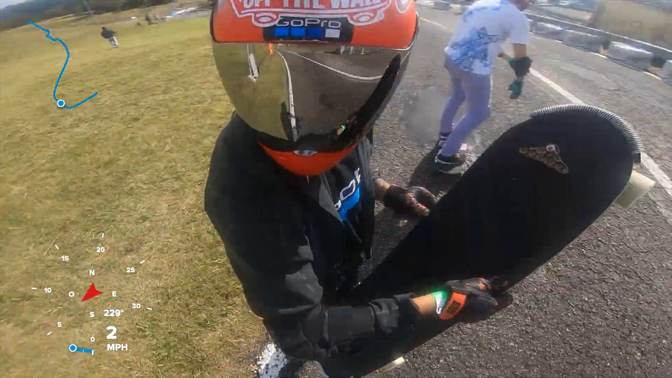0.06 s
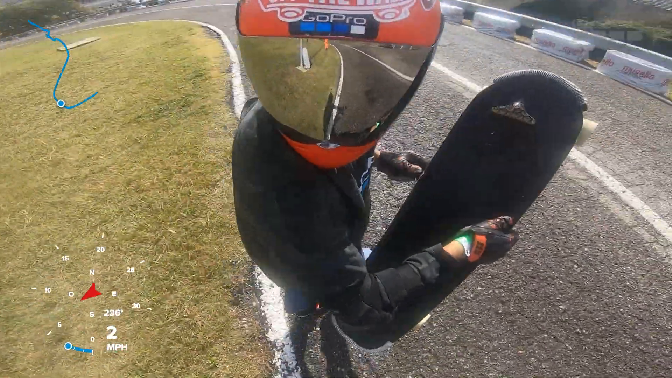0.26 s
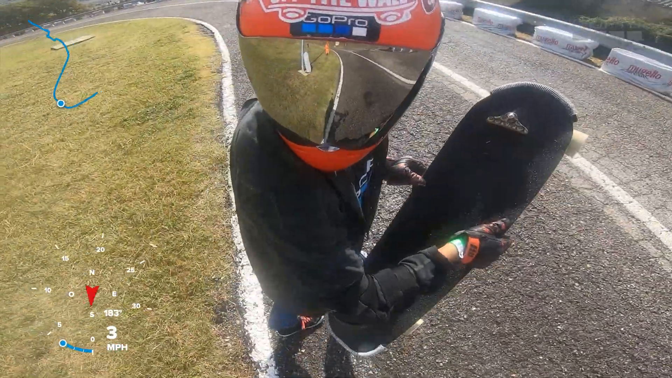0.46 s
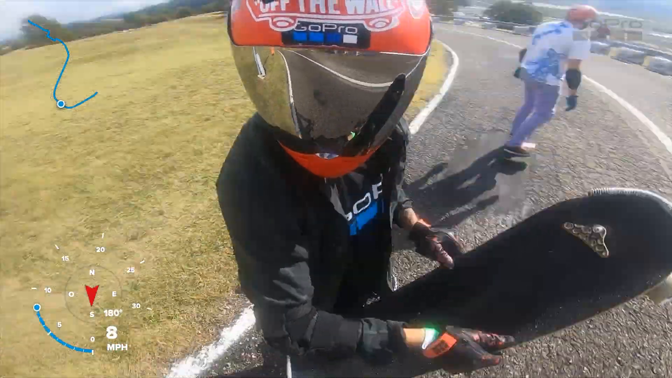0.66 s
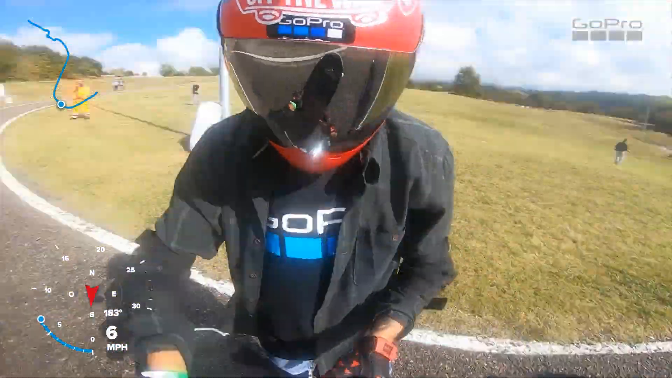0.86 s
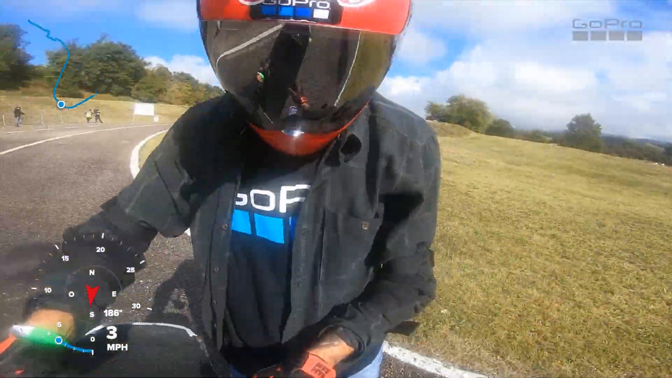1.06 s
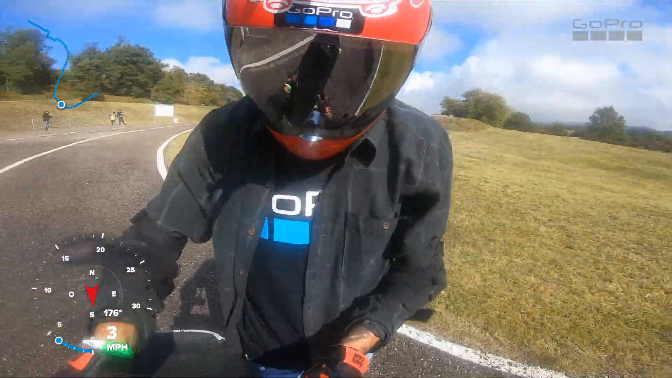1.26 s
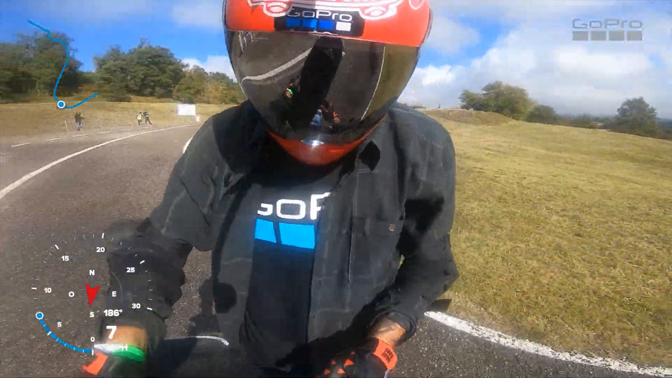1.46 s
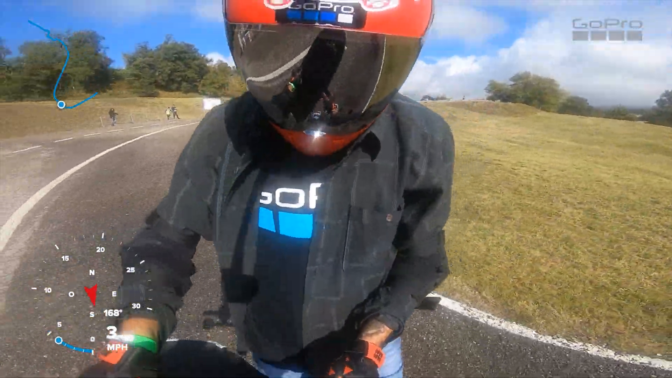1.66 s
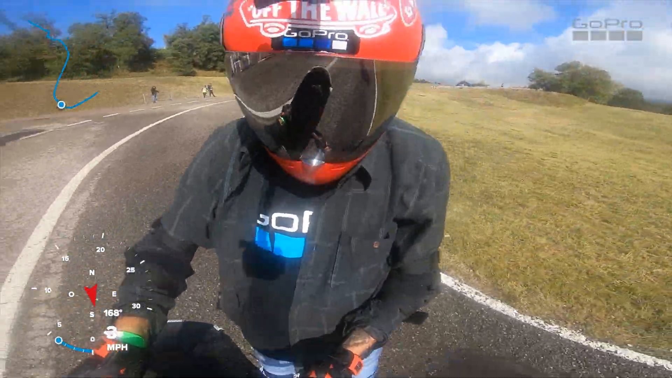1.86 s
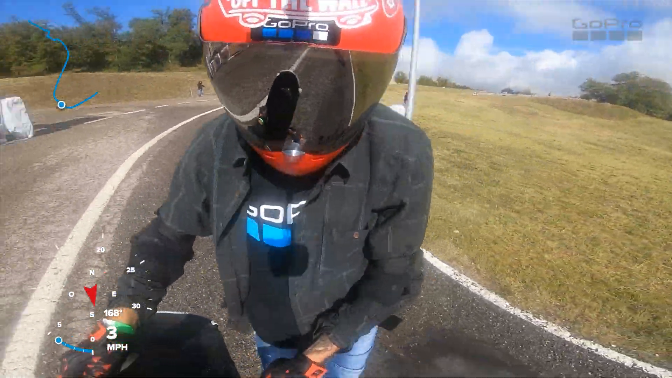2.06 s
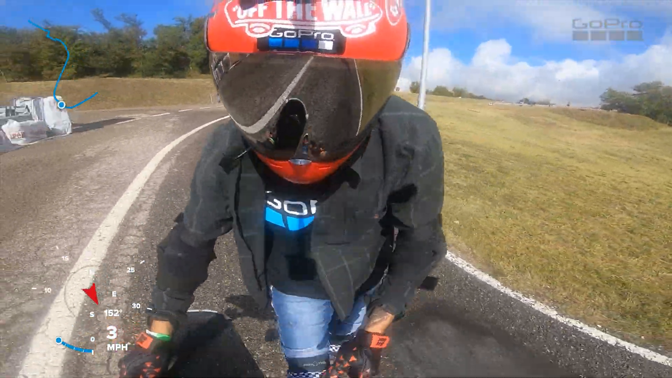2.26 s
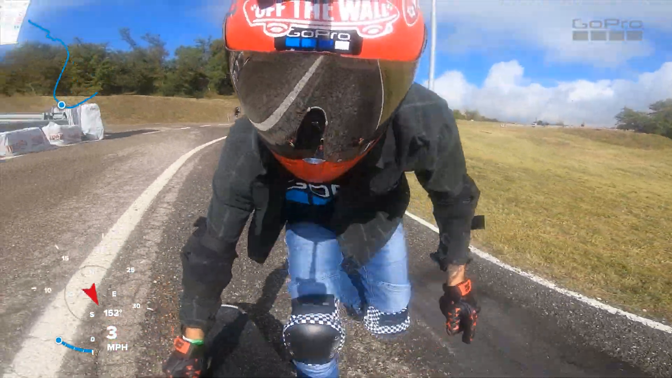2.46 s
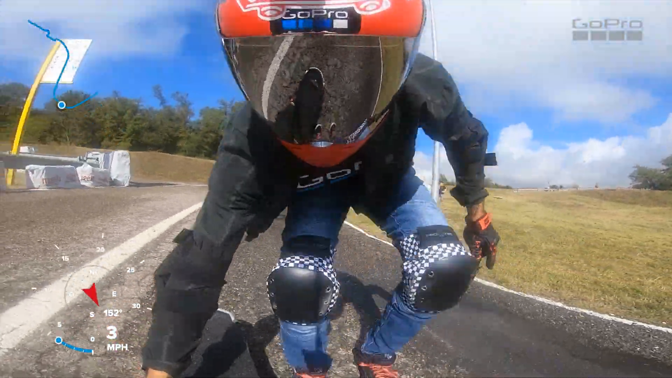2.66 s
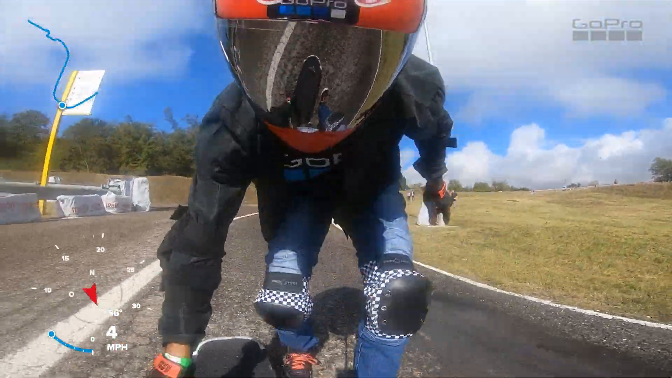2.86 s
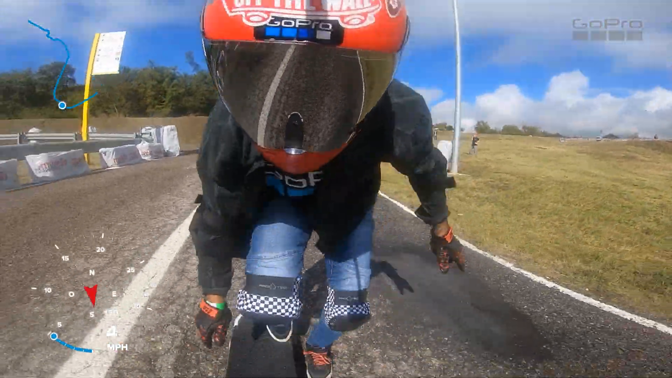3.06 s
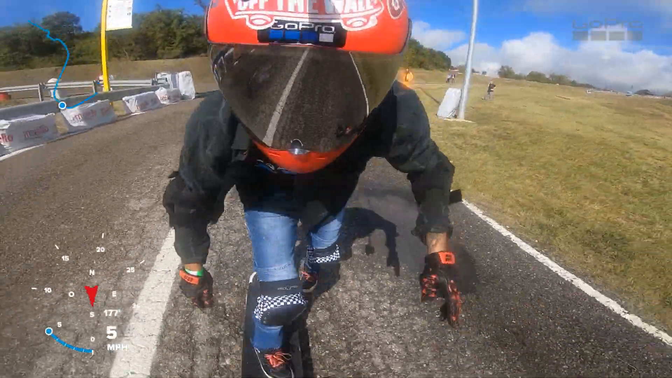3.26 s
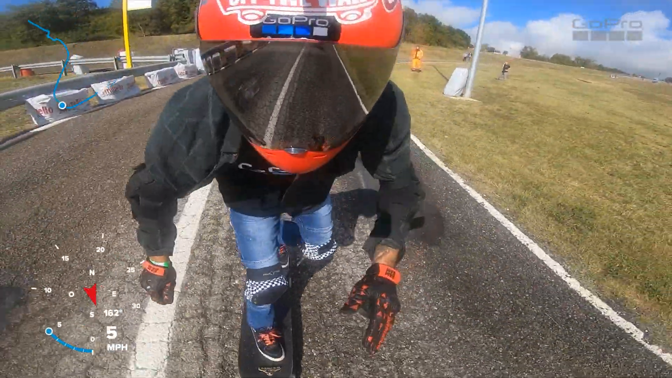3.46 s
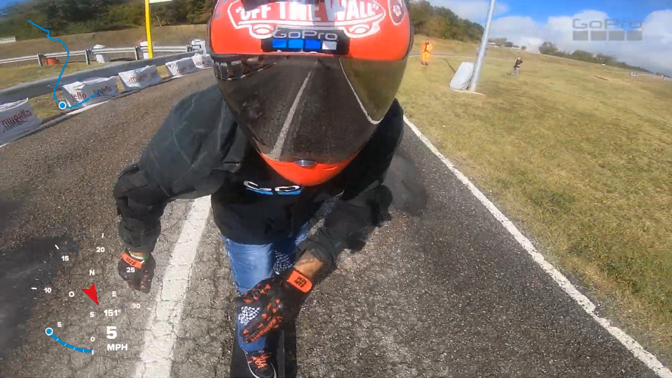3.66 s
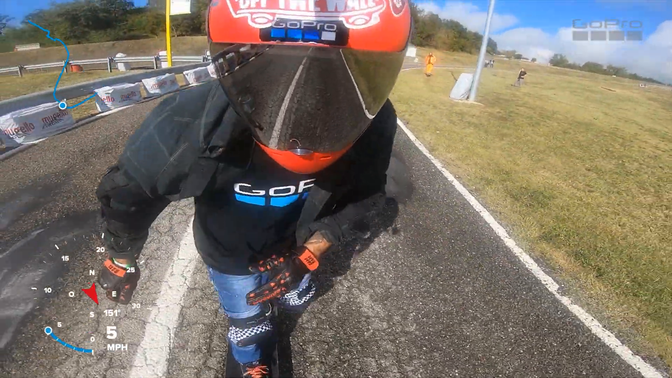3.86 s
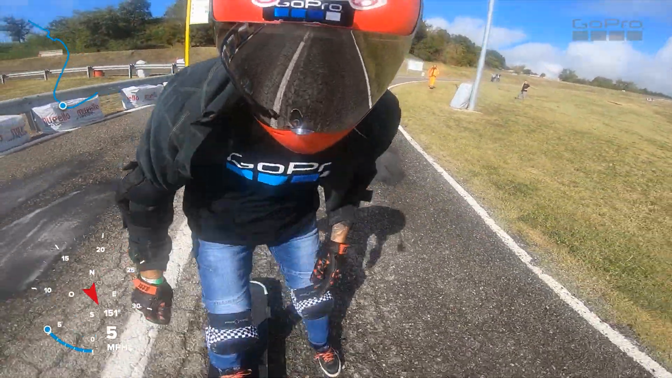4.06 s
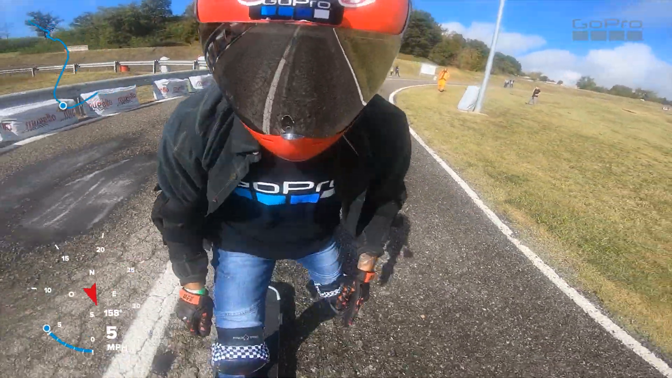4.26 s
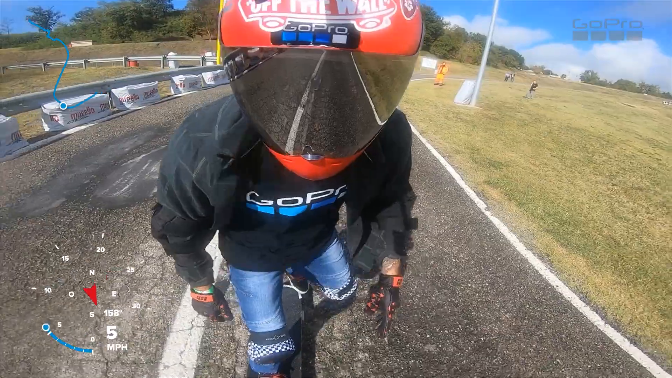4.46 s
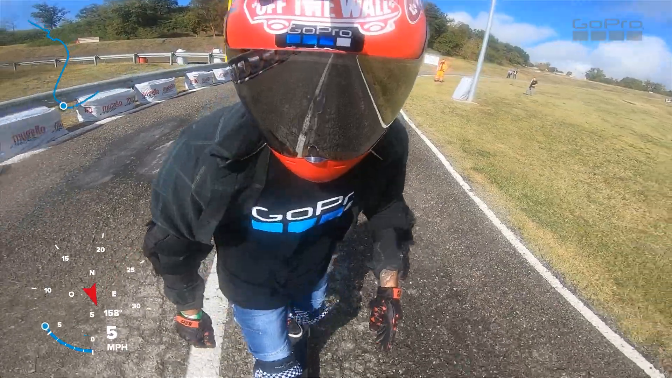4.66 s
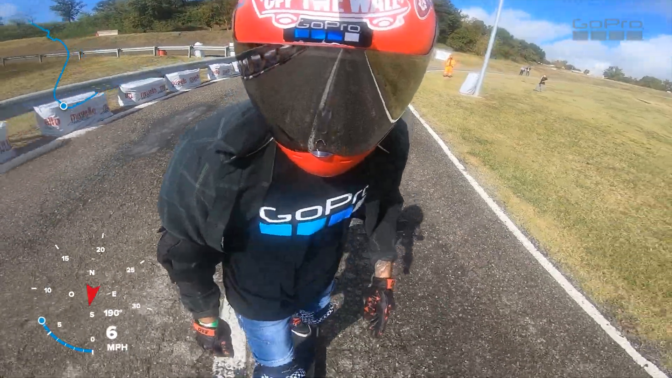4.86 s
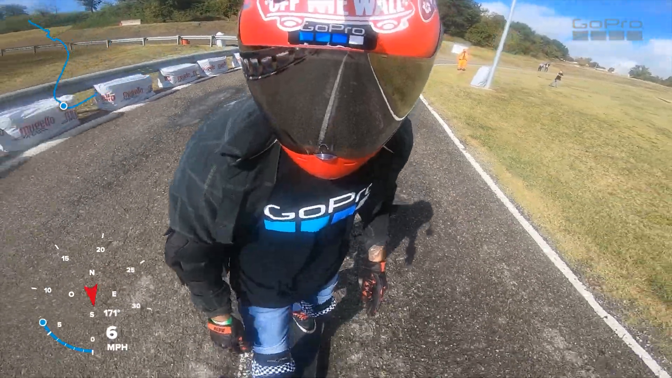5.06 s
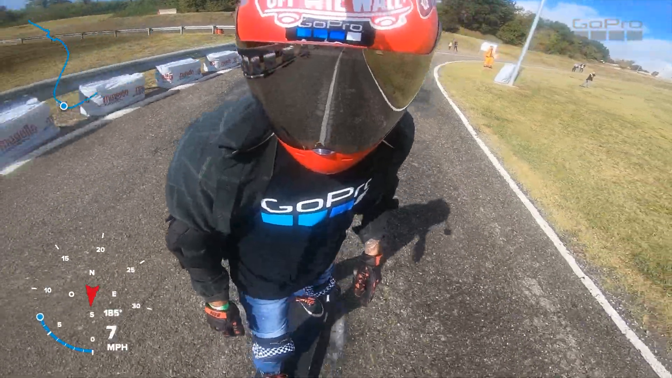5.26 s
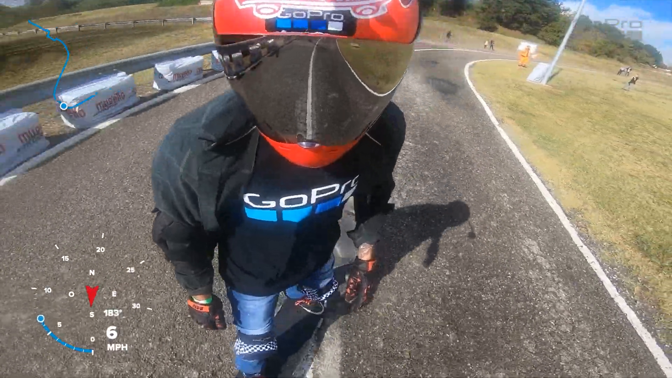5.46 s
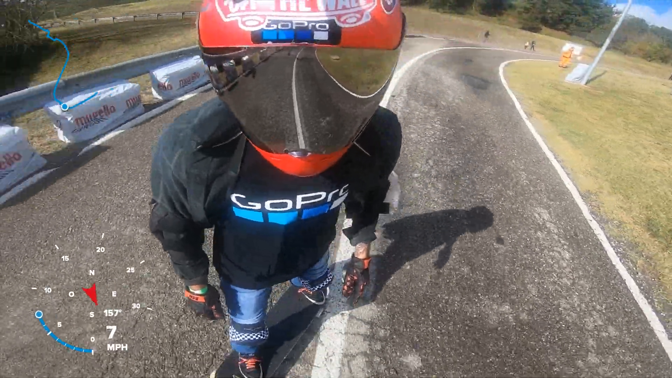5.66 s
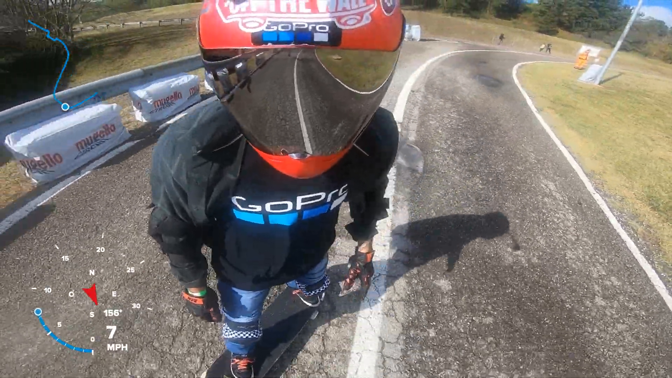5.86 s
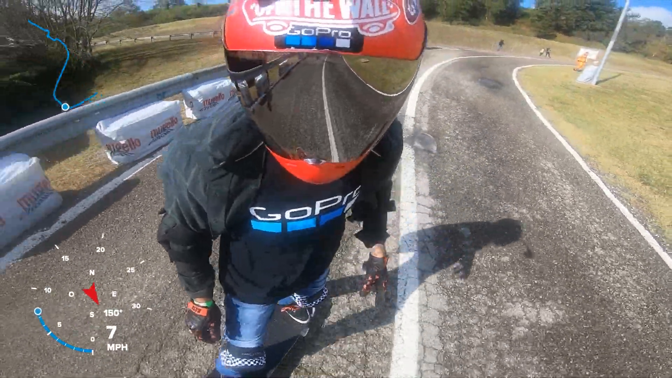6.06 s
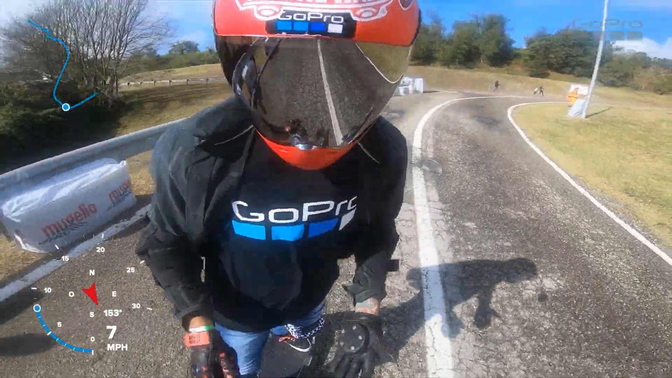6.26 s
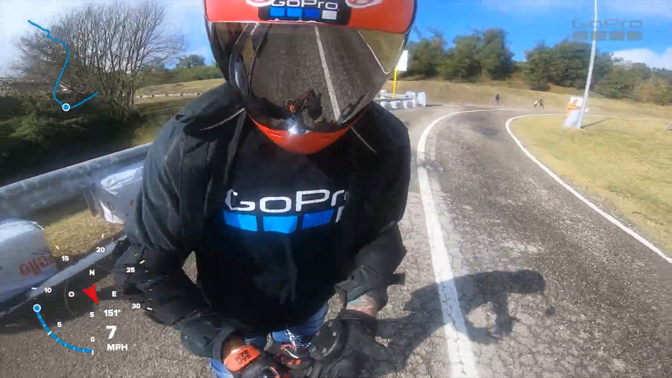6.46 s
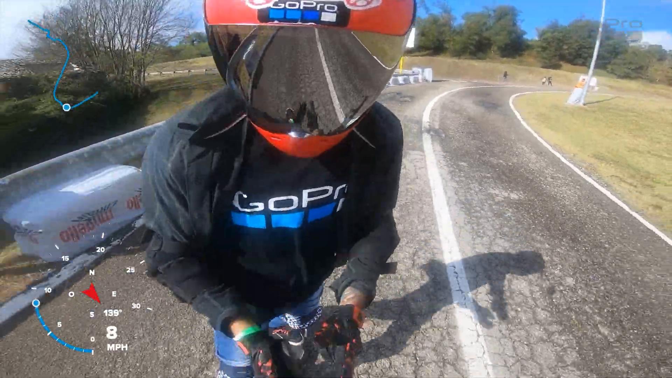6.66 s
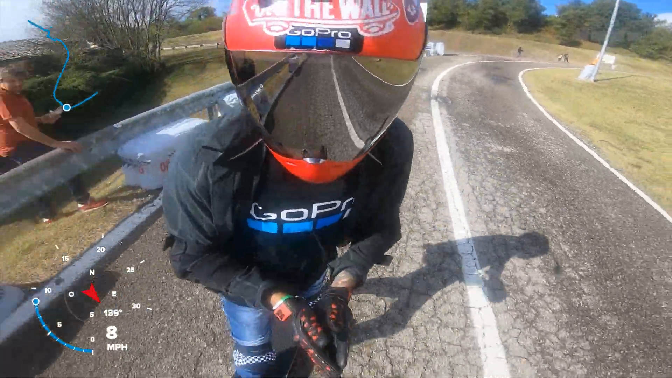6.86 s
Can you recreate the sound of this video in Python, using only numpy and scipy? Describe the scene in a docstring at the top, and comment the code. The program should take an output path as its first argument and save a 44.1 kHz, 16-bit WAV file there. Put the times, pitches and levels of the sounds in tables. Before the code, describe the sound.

Close, stereo action-camera sound on an open asphalt road: urethane wheels give a grainy mid-range hiss and crunch, strongest soon after the board is set down. Loose mount joints clack and rebound, the pole hums in short low thuds, and the helmet shell knocks hollowly. Feet scrape onto the deck midway, grip tape rasping softly. Deep wind flutters over the microphone, and rolling gradually builds again after the last violent rattle.

```python
"""On coarse asphalt, a longboarder sets the board down, runs it along under one hand, steps on and gathers
speed. Dense random impacts through damped resonances make the hiss, crunch, ticks and roar of the wheels on the
grit. The camera hangs on a pole in front of the helmet: jolts excite decaying modes of joint and pole, and the
wooden deck knocks. Shoes and gloves scuff in bursts of grit, and low-frequency noise makes the airflow buffet
the two ports."""
import sys
import numpy as np
from scipy import signal
from scipy.fft import rfft, irfft, next_fast_len
from scipy.io import wavfile
from scipy.ndimage import map_coordinates

SR = 44100
rng = np.random.default_rng(int(sys.argv[2]) if len(sys.argv) > 2 else 0)


def wav_record(signal):
    """Record a signal, one row per channel, as 16-bit PCM in the file named by sys.argv[1]."""
    frames = np.transpose(np.atleast_2d(signal))
    bounded = np.clip(frames, -1, 1)
    # unit amplitude maps onto the largest positive 16-bit level
    quanta = np.round(bounded * 32767).astype(np.int16)
    wavfile.write(sys.argv[1], SR, quanta)


N = 304731
TIME = np.arange(N) / SR
PADDED = next_fast_len(N + 2000, True)
HZ = np.maximum(np.arange(PADDED // 2 + 1) * SR / PADDED, 1)

# speed of the rider: (time [s], speed [m/s])
SPEED = [(0, 2.4), (0.8, 2.57), (2.25, 1.67), (2.8, 2.95), (4.5, 2.05), (5.5, 2.71), (6.9, 3.23)]
# relative level of the wheels' hiss on the asphalt: (time [s], level [dB])
HISS_LEVEL = [(0, -59.5), (0.3, -57), (0.55, -68), (0.75, -57), (1.1, -49), (1.9, -50), (2.2, -52.5),
              (2.85, -49.5), (3.15, -54.5), (3.5, -53), (4.1, -52), (4.45, -55.5), (5.3, -54.5), (6.9, -48)]
# resonances of wheels, deck and camera shell: (frequency [Hz], width [Hz], level [dB])
BODY_MODES = [(536, 89, 13), (799, 48, 11.5), (983, 27, 8.5), (860, 1270, 4), (1706, 206, 13.5),
              (1990, 58, -1), (2276, 160, 1), (3067, 110, -1.5), (3390, 370, 5)]
# resonances of the microphone ports in the treble: (frequency [Hz], width [Hz], level [dB])
PORT_MODES = [(4700, 910, 6), (5960, 620, -1), (7700, 2000, -5.5), (9400, 1400, -9.5)]
# buffeting spectrum: (frequency [Hz], level [dB])
BUFFET_SPECTRUM = [(20, -24), (40, -4.5), (58, -1.5), (100, -5), (200, -19), (400, -34), (1800, -83.5)]
# gusts on the ports: (time of peak [s], width [s], level [dB])
GUSTS = [(1.006, 0.052, -36), (1.49, 0.14, -36.5), (1.939, 0.038, -28.5), (2.768, 0.14, -36.5),
         (3.757, 0.5, -36), (4.864, 0.59, -37.5), (5.494, 0.94, -35.5), (6.029, 0.22, -35.5)]
# stones flicked by the wheels: (time [s], relative level [dB])
TICKS = [(0.984, -31), (1.068, -24.5), (1.395, -32.5), (1.756, -36), (2.359, -34), (6.068, -34.5)]
# what a flicked stone rings: (frequency [Hz], width [Hz], level [dB])
TICK_MODES = [(1760, 100, 7), (1970, 55, -1)]
# strongest jolts of the mount: (time [s], relative rattle of the joint [dB], relative thump of the pole [dB])
JOLTS = [(0.01, -51, -37), (0.482, -49, -52.5), (0.568, -47, -27), (0.802, -23, -13.5), (0.852, -36, -33),
         (1.015, -46, -24.5), (1.484, -52, -31), (1.919, -24.5, -21), (1.945, -34, -20.5),
         (1.962, -20.5, -15.5), (1.978, -27.5, -13.5), (2.442, -36, -22.5), (2.506, -35.5, -20.5),
         (2.525, -35.5, -22), (2.712, -32.5, -25), (2.77, -34, -17.5), (2.801, -30.5, -14.5),
         (2.989, -31.5, -13.5), (3.012, -34, -21.5), (3.111, -37, -64), (3.235, -38, -31.5),
         (3.348, -38.5, -20), (3.695, -33, -25.5), (3.984, -39, -20.5), (4.177, -19, -19.5),
         (4.194, -29, -13.5), (4.219, -17.5, -14), (4.228, -27.5, -12.5), (4.28, -30, -16.5),
         (4.319, -27.5, -33.5), (4.356, -29.5, -17), (4.717, -33.5, -20), (4.921, -37.5, -21),
         (5.137, -27, -16), (5.381, -41, -29.5), (5.487, -33.5, -23), (5.504, -32, -18),
         (5.745, -38.5, -21.5), (5.949, -37, -23), (5.97, -30, -18.5), (5.988, -30, -19),
         (6.008, -35, -18.5), (6.329, -38, -23.5), (6.411, -32, -20), (6.704, -57.5, -23.5)]
# the loose joint's modes before each blow shifts them: (frequency [Hz], width [Hz], level [dB])
JOINT_MODES = [(620, 190, 1), (814, 72, -3.5), (988.6, 38, 7.5), (1056, 61, 2), (1233, 54, -3.5),
               (1700, 190, -9), (2960, 370, -12.5)]
# the pole's bending modes: (frequency [Hz], width [Hz], level [dB])
POLE_MODES = [(164.1, 15, 8), (298.4, 53, -7.5)]
# shoes, gloves and grit scraping: (time [s], length [s], relative rasp [dB], relative fine crackle [dB])
SCUFFS = [(0.801, 0.0026, -39.5, -63.5), (1.806, 0.0018, -40, -51), (2.597, 0.03, -47, -76),
          (2.724, 0.018, -34.5, -51.5), (2.75, 0.088, -46, -70), (2.823, 0.0016, -51.5, -62),
          (2.958, 0.024, -41.5, -58.5), (3.263, 0.0063, -36.5, -65), (3.515, 0.0023, -44, -59),
          (4.018, 0.0092, -41.5, -63.5), (4.141, 0.041, -44, -67), (4.178, 0.0019, -40, -57),
          (4.323, 0.0038, -41, -66.5), (5.346, 0.015, -66, -65), (6.227, 0.014, -46, -62),
          (6.476, 0.027, -50.5, -58), (6.774, 0.013, -29.5, -42.5), (6.831, 0.039, -48.5, -65)]
# wooden knocks of the board's deck: (time [s], level [dB])
KNOCKS = [(0.804, -18.5), (1.921, -24), (2.799, -21), (4.178, -15.5), (4.184, -16.5), (4.281, -18),
          (4.357, -23)]
# the deck's modes before each blow shifts them: (frequency [Hz], width [Hz], level [dB])
DECK_MODES = [(260.4, 57, 2), (428, 23, -11), (705, 83, -5.5), (1530, 170, -9)]
# the two ports: (frequency [Hz], left minus right [dB], left leads by [rad])
PORTS = [(50, -2.5, 0), (160, -1.2, 0), (340, -2, .1), (570, 4, -1.6), (780, -2, -1.5), (1220, -5, -1.3),
         (1600, 3, .5), (2000, -2, .5), (2500, -9, -.1), (3300, 1, .4), (4800, -1, 1.9)]

CRUISE_M_S = 3.0
STEP_ON_S, SETTLE_S, HAND_LOAD = 2.67, 0.67, 0.6  # the weight moves from one hand to both feet
# how the asphalt changes the hiss from patch to patch, its resonances, and from stone to stone
PATCHY_DB, COLOUR_DB, SURGE_DB = 1.3, 3.2, 1.6
WAVER, WAVER_PER_S = .025, 12  # the wheels' resonances shift as they are squeezed
HUM_WAVER = .17  # the pole's pitch shifts as the rider's head and grip move
PEBBLES_PER_S, PEBBLE_SCATTER_DB = 40, 1.4
PATTER_PER_S, PATTER_DB = 28, -10  # small stones, and their level against the hiss
GUST_DB = 3.2  # flutter of the airflow
JOINT_DETUNE, JOINT_SPREAD_DB = .03, 2.5  # how much the modes differ from blow to blow
REBOUNDS = 3  # small after-strikes of the joint
CHOKE_S = .0025  # how fast a new contact stops the pole's hum
SCUFF_SCATTER_DB = 3.2
SHUFFLE_S, SHUFFLE_LENGTH_S = 3.713, 0.9  # the shoes twist into place on the deck
SHUFFLE_SLIPS_PER_S, SHUFFLE_SCATTER_DB, SHUFFLE_SWELL_DB = 55, 1.1, 2
TOP_HZ = 14100


def undb(db):
    """Logarithmic level: decibels to amplitude gain."""
    return 10 ** (np.asarray(db) / 20)


def curve(table):
    """Linear interpolation: the columns of a timed table at every sample."""
    s, *columns = np.transpose(table)
    return [np.interp(TIME, s, column) for column in columns]


def across(table):
    """Interpolation over log frequency: the columns of a frequency table at every bin."""
    hz, *columns = np.transpose(table)
    return [np.interp(np.log(HZ), np.log(hz), column) for column in columns]


def through(x, response):
    """Linear filtering: multiply the spectrum by a frequency response."""
    return irfft(rfft(x, PADDED) * response, PADDED)[..., :N]


def unit(x):
    """Normalization to rms 1."""
    return x / np.sqrt(np.mean(x ** 2))


def modes(table):
    """Modal superposition: the summed response of damped resonances."""
    return sum(undb(db) / (1 + 1j * (HZ ** 2 - hz ** 2) / (HZ * width)) for hz, width, db in table)


def edge(hz, kind, order):
    """Butterworth slope: the response of a low-pass or high-pass filter."""
    return signal.freqs(*signal.butter(order, 1, kind, analog=True), HZ / hz)[1]


def filtered(x, order, hz, kind="low"):
    """Causal Butterworth filtering in the time domain."""
    return signal.sosfilt(signal.butter(order, hz, kind, fs=SR, output="sos"), x)


def ring(response, size=8192):
    """Impulse response: one tap on a set of resonances, peak 1."""
    tap = irfft(response, PADDED)[:size]
    return tap / np.abs(tap).max()


def struck(table, t):
    """Free decay: damped modes ringing after one blow, those of greater width starting stronger."""
    return sum(undb(db) * width * np.exp(-np.pi * width * t) * np.sin(2 * np.pi * hz * t)
               for hz, width, db in table)


def reseated(table):
    """Changing contact conditions: every blow shifts the pitch and strength of the modes."""
    chance = np.tanh(rng.standard_normal((len(table), 2)))
    return [(hz * (1 + JOINT_DETUNE * shift), width, db + JOINT_SPREAD_DB * gain)
            for (hz, width, db), (shift, gain) in zip(table, chance)]


def walk(rate):
    """Slow random modulation: changes about rate times a second, rms 1."""
    steps = rng.standard_normal(1024)
    return unit(np.interp(TIME * rate, np.arange(len(steps)), steps))


def waver(x, share, rate):
    """Variable delay: all the resonances of a sound drift up and down together."""
    place = np.arange(N) + np.cumsum(share * walk(rate))
    return np.array([map_coordinates(side, [place], order=1, mode="mirror") for side in np.atleast_2d(x)])


def grit(rate, spread_db):
    """Random impact process: tiny hits, rate a second, a few much harder than the rest."""
    hit = rng.random(N) < rate / SR
    size = undb(spread_db * np.minimum(rng.exponential(size=N), 5))
    return unit(hit * size * rng.choice([-1, 1], N))


def spread(rate, spread_db, apart):
    """Partial correlation: grit at both ports has a shared part and an opposed part."""
    return unit(grit(rate, spread_db) + apart * grit(rate, spread_db) * np.array([[1], [-1]]))


def slips(rate, scatter_db, drag_s):
    """Short drags: random impacts smoothed by a pulse that rises and decays."""
    t = TIME[:SR // 10]
    pulse = t * np.exp(-2 * t / drag_s)
    return unit(signal.fftconvolve(np.abs(grit(rate, scatter_db)), pulse)[:N])


def rasp(x):
    """Forced resonance: grit heard through the ringing wheels, deck and shell."""
    return unit(through(x, modes(BODY_MODES) * edge(2953, "low", order=8) * edge(330, "high", order=2)))


def crackle(x):
    """Port resonance: the finest part of the grit rings in the treble."""
    return unit(through(x, modes(PORT_MODES) * edge(5600, "high", order=3) * edge(7220, "low", order=5)))


def add(out, s, sound):
    """Superposition: mix a sound in at a time."""
    start = max(int(s * SR), 0)
    out[start:start + len(sound)] += sound[:N - start]


def pace_db():
    """Speed ratio: speed against cruising speed, in decibels."""
    speed, = curve(SPEED)
    return 20 * np.log10(np.maximum(speed, .1) / CRUISE_M_S)


def load():
    """Load transfer: the share of the rider's weight that rests on the deck."""
    return np.interp(TIME, [STEP_ON_S, STEP_ON_S + SETTLE_S], [HAND_LOAD, 1])


def stir(blows, length_s):
    """Short-time energy: how strongly the jolts move the camera, smoothed over a length of time."""
    t = np.arange(-SR // 4, SR // 4) / SR
    window = np.exp(-(2 * t / length_s) ** 2)
    return np.sqrt(np.abs(signal.fftconvolve(blows ** 2, window / window.sum(), "same")))


def joint():
    """Modal response of the loose plastic joint."""
    return modes(JOINT_MODES) * edge(140, "high", order=2) * edge(4700, "low", order=8)


def pole():
    """Bending response of the camera pole."""
    return modes(POLE_MODES) * edge(107, "high", order=3)


def wheels(hiss_db=-1.04, grit_db=-22, weight_db=8.5, grit_follow=.8, grit_power=0.44, widen_db=10,
           brighten=1.0):
    """Rolling excitation: urethane crosses stones and rings in patches; speed and weight add fine grit."""
    hiss, = curve(HISS_LEVEL)
    fine = hiss.mean() + grit_follow * (hiss - hiss.mean())
    fine = fine + grit_power * pace_db() + weight_db * (load() - 1)
    patches = PATCHY_DB * walk(30) + SURGE_DB * load() * walk(110)
    stones = rfft(spread(3200, 2.52, 0.37), PADDED)
    stones = stones * edge(3185, "low", order=8) * edge(160, "high", order=2)
    body = 0
    for hz, width, db in BODY_MODES:
        response = modes([(hz, width, db)]) * np.abs(modes([(hz, 3.8 * width, 0)]))
        band = irfft(stones * response, PADDED)[:, :N]
        octaves = np.log2(hz / 1750)
        # lightly loaded wheels sound mostly at their own resonance; weight wakes the others
        reach = widen_db * (load() - 1) * abs(octaves)
        # faster wheels strike the stones more briefly and sound brighter
        tilt = brighten * pace_db() * max(octaves, 0)
        body = body + band * undb(reach + tilt + COLOUR_DB * walk(35))
    rolling = undb(hiss + hiss_db + patches) * waver(unit(body), WAVER, WAVER_PER_S)
    fine_grit = undb(fine + grit_db + patches) * crackle(spread(2000, 1.2, 0.7))
    return rolling + fine_grit


def pebbles(rasp_db=-8, crackle_db=-27, drag_s=0.0045):
    """Clustered impacts: coarser stones crunch under the wheels in small uneven clusters."""
    hiss, = curve(HISS_LEVEL)
    drags = slips(PEBBLES_PER_S, PEBBLE_SCATTER_DB, drag_s)
    grains = spread(6000, 1.5, 0.3)
    coarse = unit(through(rasp(grains), edge(1500, "high", order=2)))
    return drags * undb(hiss) * (undb(rasp_db) * coarse + undb(crackle_db) * crackle(grains))


def roar(roar_db=-63.0, speed_power=0.4, roar_hz=800, width_hz=800):
    """Broad resonance: the smooth roar of the road under the deck grows with speed."""
    response = modes([(roar_hz, width_hz, 0)]) * edge(1600, "low", order=4)
    sound = unit(through(spread(4800, 1.0, 0.63), response))
    return sound * undb(roar_db + speed_power * pace_db() + 0.5 * walk(36))


def rumble(shake_db=-40.5, speed_power=2.22, uneven_db=3.5, loose_db=-16):
    """Transmitted vibration: the road, through the rider, keeps the pole humming and the joint tapping."""
    strength = undb(shake_db + speed_power * pace_db() + uneven_db * walk(25))
    hum = unit(through(grit(200, 1.2), pole() * edge(262, "low", order=3)))
    hum = waver(hum, HUM_WAVER, WAVER_PER_S)
    taps = unit(through(grit(50, 0.64), joint() * edge(1000, "low", order=5)))
    return strength * load() ** 2 * (hum + undb(loose_db) * load() * taps)


def gusts():
    """Gaussian envelope: each gust swells and dies away evenly."""
    return sum(undb(db) * np.exp(-(2 * (TIME - s) / length) ** 2) for s, length, db in GUSTS)


def wind(blows, wind_db=-38, speed_power=6.2, swing_db=-19, sway_db=-48, lurch_db=-9, swing_s=0.17,
         apart=0.29, full_db=-36, deep_hz=42):
    """Turbulent pressure: eddies bump both ports, harder with speed and jolts; sway adds slow swings."""
    swing = stir(blows, swing_s)
    flow = np.hypot(undb(wind_db + speed_power * pace_db()) + gusts(), undb(swing_db) * swing)
    flow = flow * undb(GUST_DB * walk(22))
    sway = np.hypot(undb(sway_db), undb(lurch_db) * swing)
    colour, = across(BUFFET_SPECTRUM)
    eddies = grit(200, 0.95) + apart * rng.standard_normal((2, N))
    eddies = unit(through(eddies, undb(colour)))
    # slack air makes only slow, deep eddies; a strong flow breaks into quicker ones
    quick = np.minimum(flow / undb(full_db), 1)
    deep = through(eddies, np.abs(edge(deep_hz, "low", order=3)))
    buffet = flow * (quick * eddies + (1 - quick) * deep)
    air = rng.standard_normal(N) + 0.12 * rng.standard_normal((2, N))
    swings = unit(through(air, edge(8.1, "high", order=2) * edge(26.8, "low", order=4)))
    return buffet + swings * sway * undb(2 * walk(14))


def ticks(tick_db=1, contact_s=0.00063):
    """Impulsive excitation: loose stones snap from under the wheels; small ones patter in the hiss."""
    hiss, = curve(HISS_LEVEL)
    out = np.zeros(N)
    tap = ring(modes(TICK_MODES) * edge(1000, "high", order=4) * edge(4900, "low", order=2))
    tap = tap * (1 - np.exp(-TIME[:len(tap)] / contact_s))
    for s, db in TICKS:
        add(out, s, undb(db + tick_db) * tap / np.abs(tap).max())
    patter = unit(signal.fftconvolve(grit(PATTER_PER_S, 1), tap)[:N])
    return out + undb(hiss + PATTER_DB) * patter


def mount(push_s=0.0096, soften=0.38, early_s=0.0028, chatter_s=0.0022, chatter=0.33, rattle_db=-1.5,
          thump_db=-1, detune=0.077, soft_hz=1300, harden=0.15, rebound_s=.009, rebound_db=-9, sag=.08,
          drag_per_s=30):
    """Impact and free vibration: jolts make the joint clack and rebound; the pole hums until the next."""
    bend = ring(pole())
    t = TIME[:len(bend)]
    gaps = np.diff([row[0] for row in JOLTS], append=N / SR)
    usual = np.median([row[1] for row in JOLTS])
    hardest = max(row[2] for row in JOLTS)
    chances = rng.standard_normal((len(JOLTS), len(t)))
    out = np.zeros(N)
    for (s, rattle, thump), gap, chance in zip(JOLTS, gaps, chances):
        # one firm contact, followed by a few milliseconds of small rebounds
        contact = (t == 0) + chatter * chance * t / chatter_s * np.exp(-t / chatter_s)
        tap = filtered(struck(reseated(JOINT_MODES), t), 4, [620, 3300], "band")
        # a harder blow makes a shorter contact and a brighter clack
        bright_hz = np.clip(soft_hz * undb(harden * (rattle - usual)), 1150, 2200)
        clack = filtered(signal.fftconvolve(contact, tap)[:len(t)], 3, bright_hz)
        clack /= np.sqrt(2 * np.mean(clack[:SR // 160] ** 2))
        # after a hard blow the joint slips, and its friction cuts every ring short
        swing = undb(thump - hardest)
        friction = np.exp(-drag_per_s * swing * t)
        add(out, s, undb(rattle + rattle_db) * clack * friction)
        # the joint strikes again at uneven intervals, weaker each time
        lags = rebound_s * np.cumsum(1 + 0.394 * np.tanh(chance[1:1 + REBOUNDS]))
        for k, lag in enumerate(lags, 1):
            add(out, s + lag, undb(rattle + rattle_db + k * rebound_db) * clack * friction)
        # a softer blow bends the pole more slowly
        rise_s = push_s * undb(soften * (usual - rattle))
        hum = bend * friction * (1 - np.exp(-(t / rise_s) ** 2))
        # the slack joint makes wide swings lower in pitch, and no two alike
        pitch = 1 - sag * swing + detune * np.tanh(chance[0])
        thud = np.interp(t * pitch, t, hum / np.abs(hum).max())
        held = np.exp(-np.maximum(t - gap - early_s, 0) / CHOKE_S)
        add(out, s - early_s, undb(thump + thump_db) * held * thud)
    return out


def flex(blows, flex_db=-17, lag_s=0.11):
    """Heavily damped bending: around each jolt pole and helmet flex in a dull thud that swells and fades."""
    loose = modes([(hz, 2 * width, db) for hz, width, db in POLE_MODES])
    loose = loose * edge(260, "low", order=4) * edge(65, "high", order=2)
    thud = unit(through(rng.standard_normal(N), loose))
    return undb(flex_db) * stir(blows, lag_s) * waver(thud, HUM_WAVER, WAVER_PER_S)


def clatter(blows, clatter_db=-27, lag_s=0.027, rate=260):
    """Repeated contact: while the pole swings hard, the loose joint taps on in a ragged run."""
    loose = modes([(hz, 2.3 * width, db) for hz, width, db in JOINT_MODES])
    loose = loose * edge(300, "high", order=2) * edge(1900, "low", order=5)
    taps = through(spread(rate, 0.76, .25), loose)
    return undb(clatter_db) * stir(blows, lag_s) * unit(taps)


def scuffs(rasp_db=1, crackle_db=0, release_s=0.0053):
    """Sliding friction: each short slide is a dense, jerky burst of grit."""
    coarse, fine = np.zeros(N), np.zeros(N)
    t = TIME[:SR // 5]
    for s, length, rasp_level, crackle_level in SCUFFS:
        slide = np.minimum(t / 0.0021, 1) * np.exp(-np.maximum(t - length, 0) / release_s)
        add(coarse, s, undb(rasp_level + rasp_db) * slide)
        add(fine, s, undb(crackle_level + crackle_db) * slide)
    thin = edge(820, "high", order=2) * edge(3000, "high", order=1)
    scrape = unit(through(rasp(spread(5800, SCUFF_SCATTER_DB, 0.16)), thin))
    jerks = unit(undb(SCUFF_SCATTER_DB * walk(260)))
    return jerks * (coarse * scrape + fine * crackle(spread(9100, 0.82, 0.61)))


def knocks(knock_db=0, contact_s=0.0017, soft_hz=1900):
    """Deck vibration: the heaviest blows knock the wooden deck, short, hollow and dry."""
    t = TIME[:SR // 10]
    out = np.zeros(N)
    for s, db in KNOCKS:
        deck = struck(reseated(DECK_MODES), t) * (1 - np.exp(-t / contact_s))
        knock = filtered(deck, 4, soft_hz)
        add(out, s, undb(db + knock_db) * knock / np.abs(knock).max())
    return out


def shuffle(rasp_db=-53, crackle_db=-73, slip_s=0.0024, steady=0.15):
    """Stick-slip friction: soles slide over grip tape in a soft, uneven scrape with fine crackles."""
    slipping = slips(SHUFFLE_SLIPS_PER_S, SHUFFLE_SCATTER_DB, slip_s)
    turning = np.exp(-(2 * (TIME - SHUFFLE_S) / SHUFFLE_LENGTH_S) ** 4)
    grains = spread(5500, 2.3, 0.71)
    coarse = unit(through(rasp(grains), edge(1400, "high", order=2)))
    coarse = coarse * undb(SHUFFLE_SWELL_DB * walk(70))
    fine = unit(through(crackle(grains), edge(7500, "high", order=2))) * unit(slipping + steady)
    return turning * (undb(rasp_db) * coarse + undb(crackle_db) * fine)


def scene():
    """Superposition of everything that reaches the camera."""
    blows = mount()
    rolling = wheels() + pebbles() + roar() + rumble() + ticks()
    jolting = blows + flex(blows) + clatter(blows) + knocks()
    return rolling + wind(blows) + jolting + scuffs() + shuffle()


def record(dry):
    """Interchannel difference: the ports differ in level and phase; the recorder cuts the top."""
    balance, lead = across(PORTS)
    half = undb(balance / 2) * np.exp(.5j * lead)
    heard = through(dry, np.array([half, 1 / half]))
    return signal.sosfilt(signal.ellip(8, .2, 80, TOP_HZ, fs=SR, output="sos"), heard)


dry = scene()
out = record(dry)
wav_record(out)
```